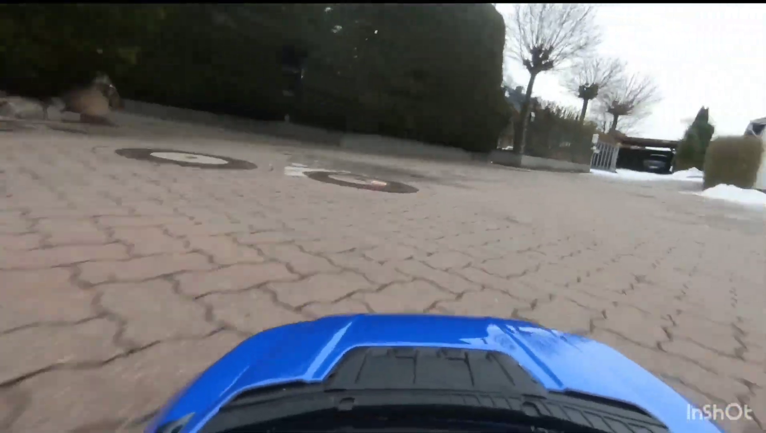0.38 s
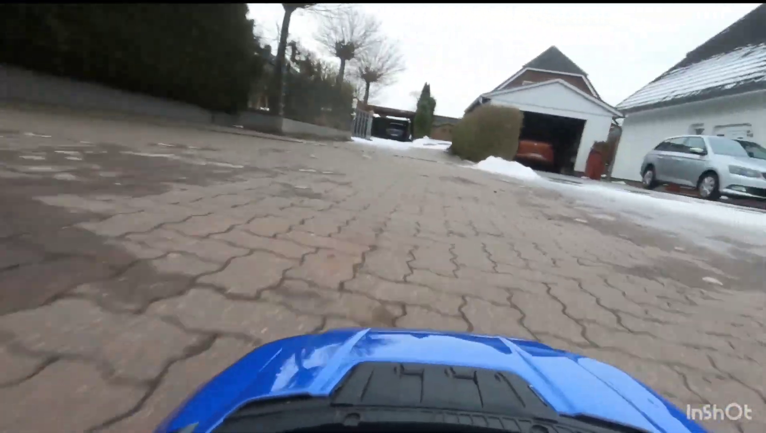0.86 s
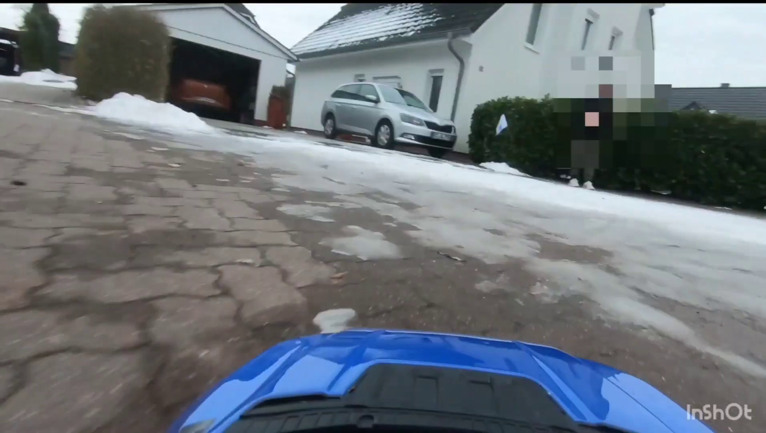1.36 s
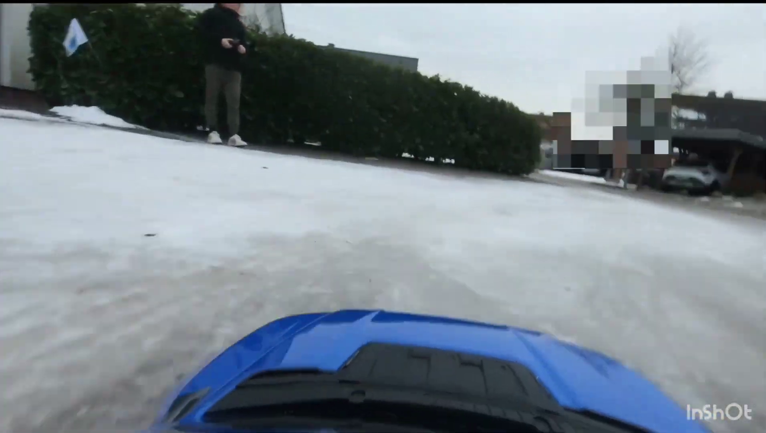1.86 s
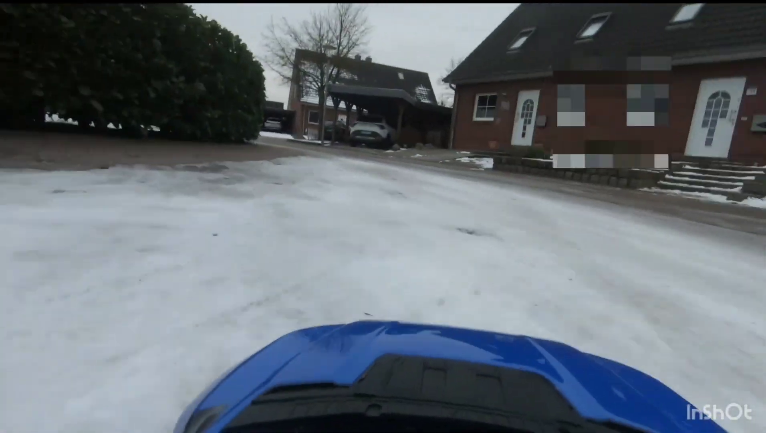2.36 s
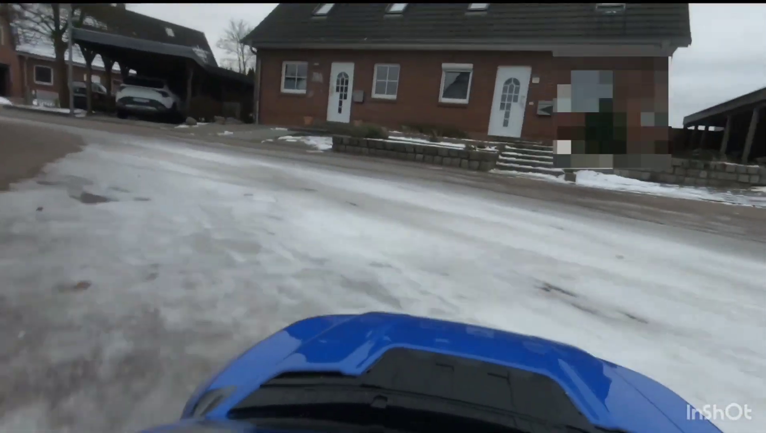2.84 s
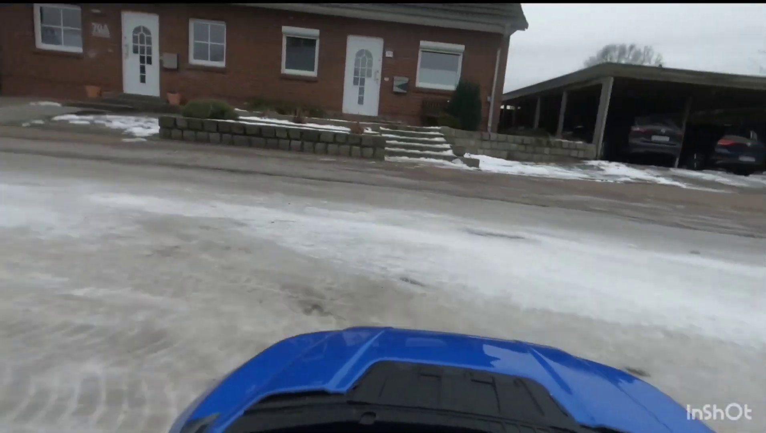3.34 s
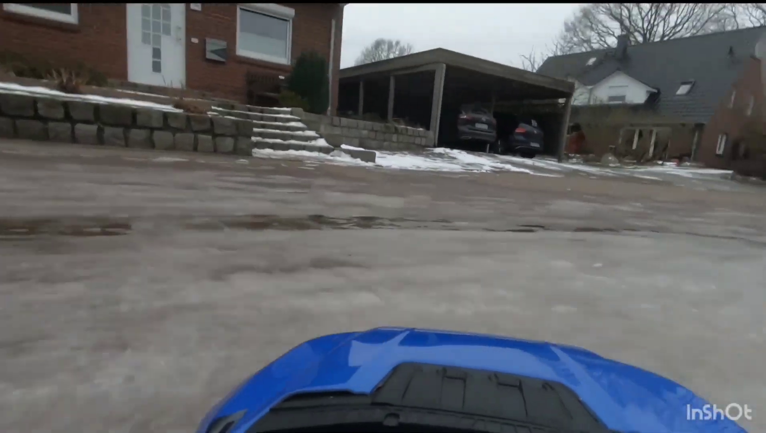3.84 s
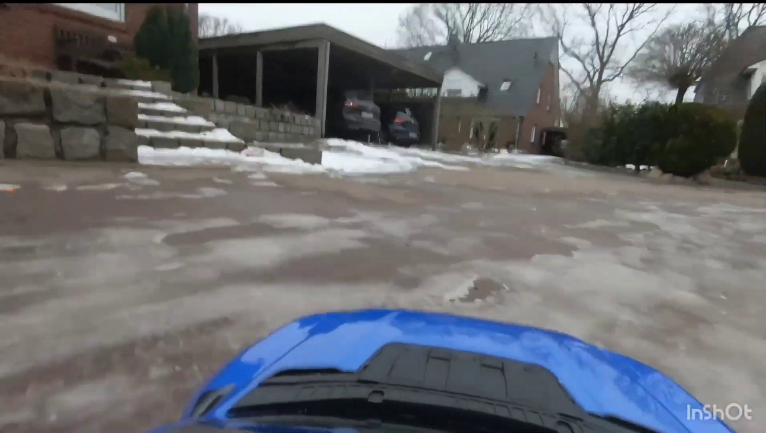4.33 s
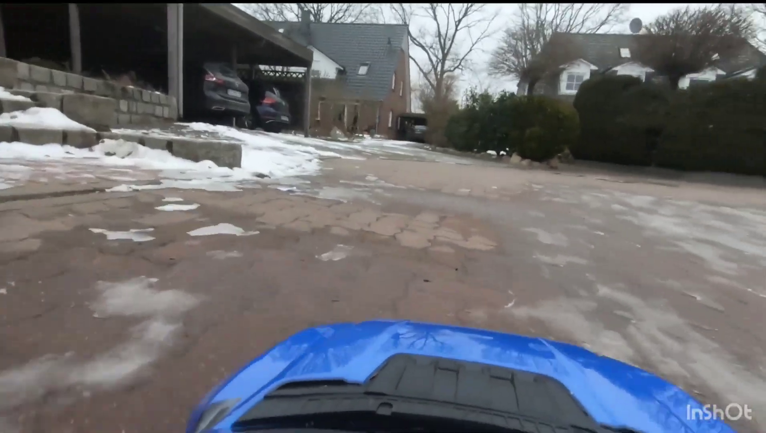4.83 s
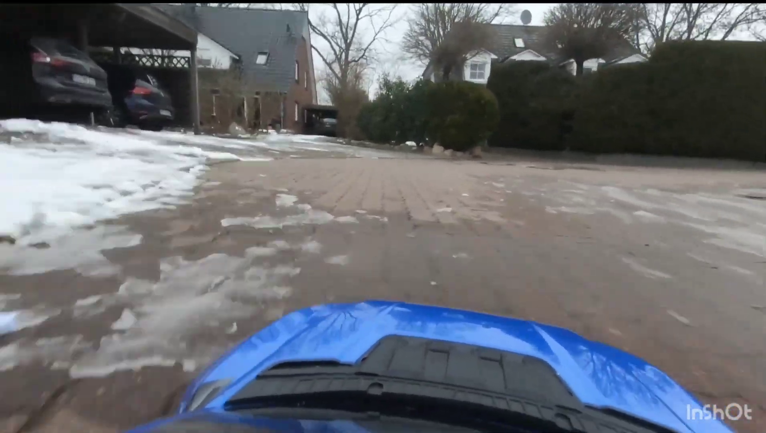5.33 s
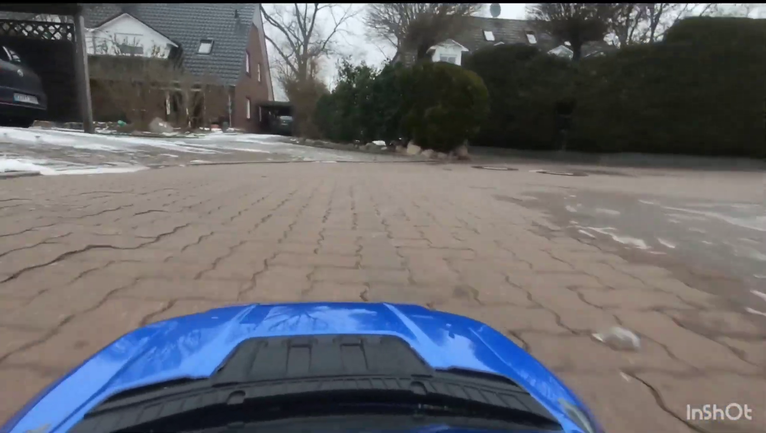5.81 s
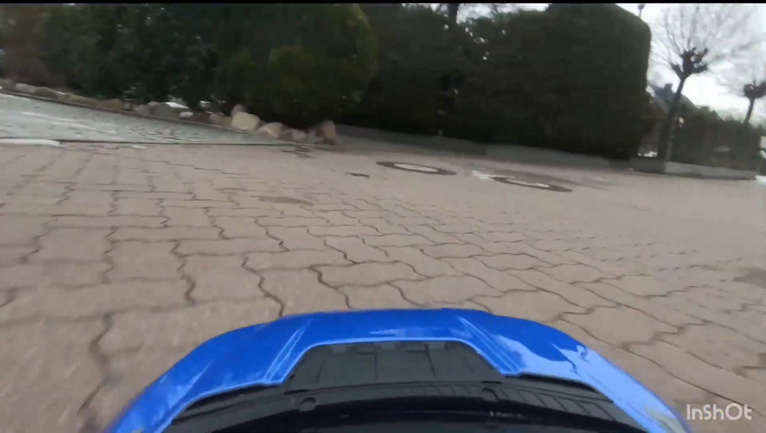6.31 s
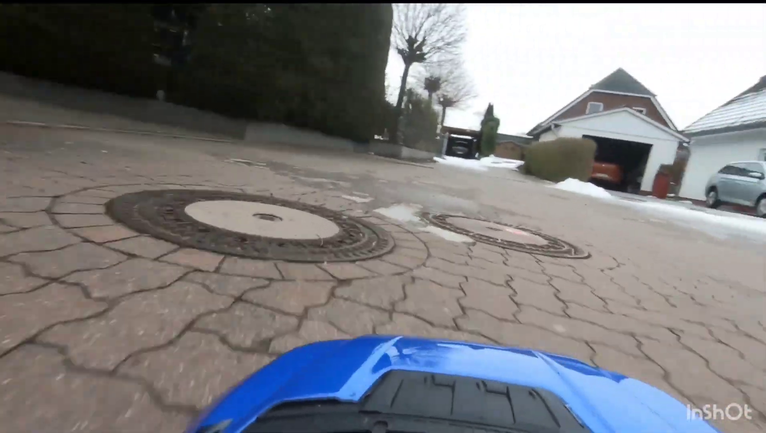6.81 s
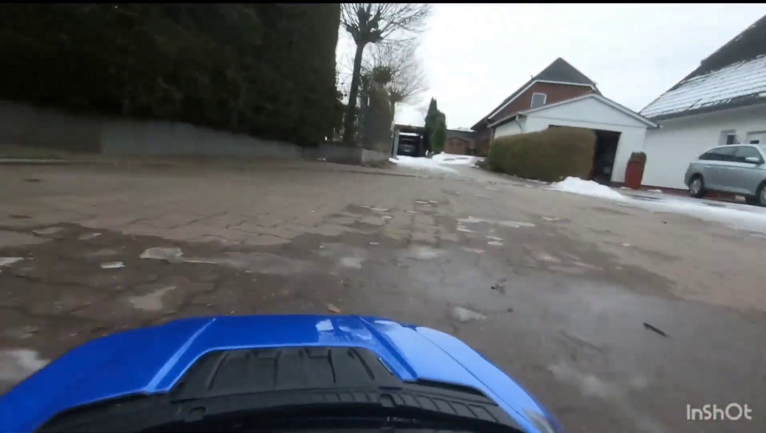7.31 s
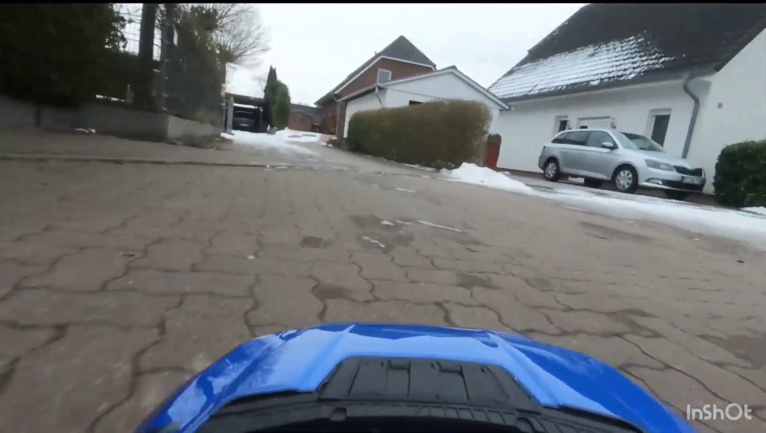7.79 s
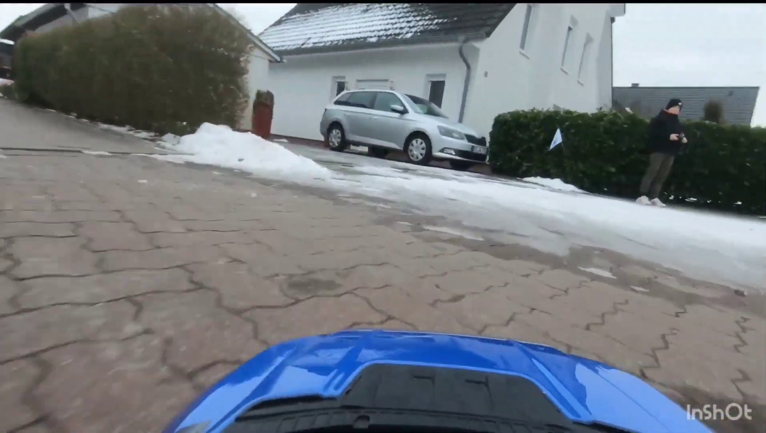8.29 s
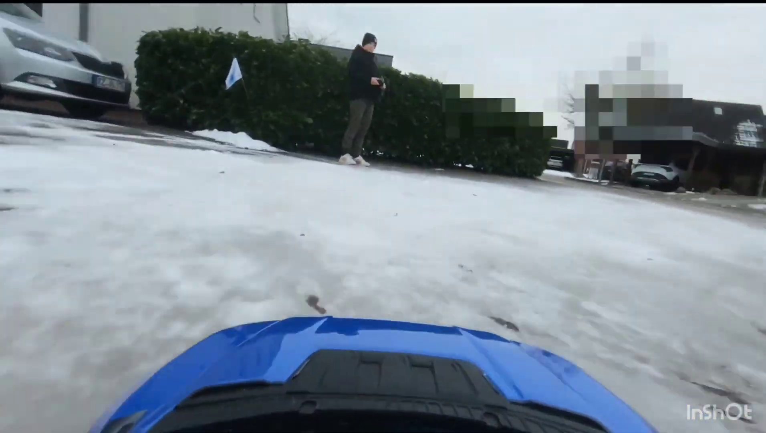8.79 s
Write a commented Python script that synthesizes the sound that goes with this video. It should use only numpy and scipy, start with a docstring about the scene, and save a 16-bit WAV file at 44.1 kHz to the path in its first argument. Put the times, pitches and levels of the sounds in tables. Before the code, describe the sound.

Muffled onboard sound of a small remote-controlled truck: booming bass shake, wobbling gear whine surging on ice, plastic chassis rattle and ice lumps knocking.

```python
"""Paving stones and icy slush under a small electric radio-controlled truck, heard inside a camera case on its roof.
The shaking mount fills the bass as low resonant noise; the tyres and plastic chassis drum, rattle and crunch
as filtered noise; ice lumps strike as scrapes with a brief panel ring. The gear mesh whines as wobbling sines
that follow the motor speed. The muffling case wall filters all but the shake and the panel ring."""
import sys
import numpy as np
from scipy import signal
from scipy.fft import rfft, irfft
from scipy.io import wavfile
from scipy.ndimage import uniform_filter1d

SR = 44100
rng = np.random.default_rng(int(sys.argv[2]) if len(sys.argv) > 2 else 0)


def linear_from_db(decibels):
    """Turn decibels (scalar or array-like) into linear amplitude factors; 0 gives 1."""
    return 10 ** (np.asarray(decibels, float) / 20)


def dump_mix(stems):
    """Bounce the given channels to the path in sys.argv[1] as a 16-bit WAV at rate SR."""
    frames = np.atleast_2d(stems).T  # one column per channel
    limited = np.clip(frames, -1, 1)  # hard clip at full scale
    pcm = np.round(limited * 32767).astype(np.int16)
    wavfile.write(sys.argv[1], SR, pcm)


N = 403956


def curves(table):
    """Linear interpolation: the columns of a time table, one value a sample."""
    s, *columns = np.transpose(table)
    return [np.interp(np.arange(N) / SR, s, column) for column in columns]


def unit(x):
    """Normalisation: scale to rms 1."""
    return x / np.sqrt(np.mean(x ** 2))


def band(x, kind, hz, order=4):
    """Butterworth filtering: a maximally flat pass band."""
    return signal.sosfilt(signal.butter(order, hz, kind, fs=SR, output="sos"), x)


def colour(x, points, modes=(), size=16384):
    """Minimum-phase filtering: a causal response whose gain follows (Hz, dB) points plus bell-shaped lifts."""
    hz = np.maximum(np.arange(size // 2 + 1) * SR / size, 1)
    points_hz, points_db = np.transpose(points)
    db = np.interp(np.log(hz), np.log(points_hz), points_db)
    for centre_hz, width_hz, lift_db in modes:
        db = db + lift_db / (1 + (2 * (hz - centre_hz) / width_hz) ** 2)
    # folding the cepstrum onto positive time makes the response causal
    cepstrum = irfft(np.log(linear_from_db(db)))
    cepstrum[1:size // 2] *= 2
    cepstrum[size // 2 + 1:] = 0
    response = irfft(np.exp(rfft(cepstrum)))
    return signal.fftconvolve(x, response)[:len(x)]


def walk(rate):
    """Low-passed random process: a smooth wander, about rate turns a second, spread 1."""
    k = max(int(SR / rate), 1)
    once = uniform_filter1d(rng.standard_normal(N), k)
    return unit(uniform_filter1d(once, k))


def swells(table):
    """Superposition: Gaussian swells from rows of centre, full width at 1/e, and size."""
    t = np.arange(N) / SR
    return sum(db * np.exp(-(2 * (t - s) / length_s) ** 2) for s, length_s, db in table)


# broad colour of the case wall: frequency_hz, gain_db
CASE_COLOUR = [(100, -9.5), (200, -10), (400, -8.5), (700, -12), (1100, -4.5), (1600, -11.5), (2400, -25),
               (3500, -27), (4500, -34.5), (6000, -39), (7500, -55), (10000, -59.5), (14000, -77.5)]
# resonances and gaps of the case wall: centre_hz, width_hz, lift_db
CASE_RESONANCES = [(141.6, 25, 14.5), (212.6, 76.5, 12), (361, 112, 8), (484.7, 189, -14.5), (620, 74, 5),
                   (850, 88, 4.5), (1163, 112, 5), (1370, 20, 6.5), (1837.5, 98, 10.5), (2270, 390, 10),
                   (2790, 130, -9.5), (2920, 300, 7), (3894, 182, 13.5), (3920, 460, -3.5), (5670, 350, 3),
                   (6180, 160, -5), (6800, 250, 1), (7080, 210, -6), (8000, 670, 6.5), (9300, 310, 0),
                   (9600, 500, -5.5)]


def case_wall(x, size=16384):
    """Transmission loss: the wall muffles the treble, and its resonances lift or notch narrow bands."""
    return colour(x, CASE_COLOUR, CASE_RESONANCES, size)


# excitation of the mount: frequency_hz, relative density_db_per_hz
SHAKE_SPECTRUM = [(4.7, -46.5), (8.0, -5.5), (37, 1), (59, -1), (84, -4), (113, -12.5), (140, -15.5),
                  (180, -44.5), (310, -120)]
# mount resonances: centre_hz, width_hz, lift_db
MOUNT_RESONANCES = [(30.6, 9.9, 4), (61.1, 7, 6.5), (79.5, 7.8, 3.5)]
# strength of the mount shake: time_s, level_db
SHAKE_LEVEL = [(0, -14.5), (.9, -15.5), (1.3, -16), (1.9, -14), (2.1, -17), (2.32, -12.5), (2.5, -15.5),
               (3.25, -16.5), (3.5, -13), (4.7, -15.5), (4.8, -16.5), (6.0, -14), (6.12, -17), (6.55, -15),
               (7.55, -14), (7.72, -16.5), (8.0, -15.5), (9.16, -15)]


def shake():
    """Saturating resonator: the mount swings at low frequencies, and bounded travel flattens big swings."""
    push = unit(colour(rng.standard_normal(N), SHAKE_SPECTRUM, MOUNT_RESONANCES, size=65536))
    swing = np.tanh(0.44 * push)
    return linear_from_db(curves(SHAKE_LEVEL)[0]) * unit(band(swing, "low", 165))


def taps(shared_db, share, spread_db):
    """Random impacts: noise of uneven strength with scattered small ticks, heard through the case wall."""
    # about 60 ticks a second, each fading by 1/e in 3 ms
    ticks = (rng.random(N) < 60 / SR) * linear_from_db(spread_db * rng.random(N) ** 2)
    ticks = signal.lfilter([1], [1, -np.exp(-1 / (.003 * SR))], ticks)
    uneven = linear_from_db(shared_db + 0.63 * walk(120)) * (1 + share * ticks)
    return case_wall(rng.standard_normal(N) * uneven)


BRIGHT_FROM_HZ = 2700  # where dull contact noise gives way to bright

# the ground under the tyres, by roughness and lumpiness: time_s, rattle_db, drumming_db
ROAD_SURFACE = [(0, -39, -26.5), (.44, -35, -29), (.7, -39, -29), (1.15, -38, -28), (1.45, -37.5, -29.5),
                (1.8, -31.5, -27), (2.0, -34.5, -22.5), (2.1, -37.5, -30.5), (2.3, -35, -26),
                (2.55, -38.5, -32.5), (2.9, -37.5, -33.5), (3.45, -34.5, -27), (3.75, -35.5, -26.5),
                (4.11, -40.5, -32), (4.4, -34, -22.5), (4.6, -34.5, -27), (4.77, -38.5, -32),
                (4.87, -37.5, -39.5), (5.0, -35.5, -38.5), (5.3, -35, -34), (5.5, -35.5, -30.5),
                (6.05, -38.5, -30.5), (7.05, -38.5, -28.5), (7.35, -35.5, -24), (7.9, -39, -31.5),
                (8.2, -38.5, -30.5), (8.6, -38, -31), (8.95, -36, -27.5), (9.16, -35.5, -25.5)]
# a wheel rides over a joint or lump: centre_s, length_s, drumming_lift_db
WHEEL_BUMPS = [(1.25, 0.045, 5), (1.84, 0.036, 0.5), (1.98, 0.049, 6.5), (2.32, 0.046, 8), (2.52, 0.083, 6),
               (2.74, 0.16, 11), (3.01, 0.15, 8.5), (3.7, 0.11, 3), (4.35, 0.02, 1), (7.18, 0.037, 6),
               (7.32, 0.051, 2), (8.21, 0.073, 11.5), (8.79, 0.088, 7), (8.95, 0.098, 4.5)]
# the wheels leave the ground for a moment: centre_s, length_s, rattle_dip_db
WHEEL_HOPS = [(2.035, 0.024, 9), (2.62, 0.019, 6), (4.46, 0.061, 8.5), (4.545, 0.016, 5), (4.607, 0.013, 5)]


def chassis():
    """Rolling-contact noise: tyres and loose plastic drum low, rattle in the middle and crunch on top."""
    drum_top_hz, crunch_from_hz = 480, 4300
    rattle_db, drum_db = curves(ROAD_SURFACE)
    bumps_db, hops_db = swells(WHEEL_BUMPS), swells(WHEEL_HOPS)
    rattle_db = rattle_db + 0.44 * bumps_db - hops_db
    drum_db = drum_db + bumps_db - 0.88 * hops_db

    mesh_hz = curves(MESH_DRIVE)[0]
    octaves = np.log2(mesh_hz / 800)
    # below a mesh rate of 420 Hz the rattle's upper part dies away by 24 dB per octave
    crawl_db = -24 * np.maximum(np.log2(420 / mesh_hz), 0)
    bright_db = 0.5 + 3.5 * octaves + 0.3 * crawl_db  # brighter with speed

    shared_db = 0.73 * walk(34) + 2.0 * walk(160)
    body = taps(shared_db, share=0.38, spread_db=7.5)
    grit = taps(shared_db, share=0.13, spread_db=12)

    drum = band(band(body, "high", 110), "low", drum_top_hz)
    scale = np.std(band(body, "band", [1400, 2300]))  # rattle level refers to this band
    dull = band(band(body, "high", drum_top_hz), "low", BRIGHT_FROM_HZ)
    dull = linear_from_db(crawl_db) * dull + (1 - linear_from_db(crawl_db)) * band(dull, "low", 1800)
    bright = band(grit, "high", BRIGHT_FROM_HZ)
    # harder running lifts the crunchy top more than the rest
    crunch = linear_from_db(0.43 * (rattle_db + 26.5) - 9) * band(bright, "high", crunch_from_hz)
    rattle = (dull + linear_from_db(bright_db) * (bright + crunch)) / scale
    return linear_from_db(drum_db) * unit(drum) + linear_from_db(rattle_db) * rattle


# ice lumps and stones on the chassis: time_s, strength_db, relative brightness_db, ring_time_ms
ICE_KNOCKS = [(0.181, -15, -29, 5), (1.838, -6, -29.5, 3), (1.882, -11, -31, 3), (1.9, -4, -26.5, 2.8),
              (1.935, -18, -22, 4), (1.946, -11, -16, 2.5), (1.977, -11.5, -19, 3), (2.01, -5, -21, 2.7),
              (2.121, -12.5, -44, 3.4), (2.179, -14, -28.5, 3.5), (2.205, -13.5, -36, 4),
              (2.308, -8, -24, 3), (2.323, -2.5, -28, 2.7), (2.342, -12.5, -28, 3), (2.381, -7, -26, 3),
              (2.503, -17, -21.5, 3), (2.584, -14, -33, 5), (2.647, -18.5, -19.5, 2.5), (2.712, -9, -25, 8),
              (2.99, -12, -25, 3.7), (3.107, -17, -21, 3), (3.341, -10.5, -42, 3), (3.469, -6, -34, 4),
              (3.841, -11.5, -29, 4.4), (3.911, -10.5, -28, 2.8), (3.926, -12.5, -29, 3.2),
              (3.975, -16.5, -24, 4), (4.162, -14.5, -31, 4.4), (4.225, -25, -15, 3), (4.262, -23, -27, 5),
              (4.282, -11, -16.5, 3.6), (4.335, -19, -26, 6), (4.351, -13.5, -22, 7),
              (4.357, -17, -18.5, 3), (4.374, -22, -19, 4), (4.396, -21, -26, 4.6), (4.41, -15.5, -20, 5),
              (4.42, -2, -26, 2.9), (4.505, -10, -30, 6.5), (4.528, -21, -30, 7), (4.58, -14.5, -36, 3.6),
              (4.669, -24, -26, 4), (4.706, -15, -29, 3), (5.369, -16, -32, 3.7), (5.514, -17, -30, 3),
              (5.852, -16, -34, 2.6), (7.106, -19, -23, 2.5), (7.18, -16.5, -30, 6), (7.5, -10, -28.5, 3.6),
              (7.522, -14.5, -25, 4), (7.559, -14, -31, 4), (7.625, -19.5, -25, 3),
              (8.198, -12.5, -35.5, 3.6), (8.948, -5.5, -19, 2.5), (8.992, -7, -31, 3.5),
              (9.009, -13, -18, 3), (9.035, -8.5, -31, 2.4)]
# modes of the struck panel: frequency_hz, relative level_db
PANEL_MODES = [(990, -6.5), (1140, -0.5), (1310, -8.5)]


def knocks(lead_s=.0045, rise_s=.0018, fall_s=.0028, size=4096):
    """Impact excitation: a lump scrapes ever harder, strikes and rings a panel; the wall filters the scrape."""
    out = np.zeros(N + size)
    t = (np.arange(size) - size // 2) / SR
    scraping = np.where(t < rise_s, np.exp((t - rise_s) / lead_s), np.exp(-(t - rise_s) / fall_s))
    for s, db, bright_db, ring_ms in ICE_KNOCKS:
        scrape = case_wall(rng.standard_normal(size) * scraping, size=4096)
        dull = band(scrape, "low", BRIGHT_FROM_HZ)
        # the hard contact itself is brighter and briefer than the scrape
        contact = (np.gradient(scrape) + 0.27 * scrape) * scraping
        bright = band(contact, "high", BRIGHT_FROM_HZ)

        # a longer, softer contact swells more slowly and rings on
        age = np.maximum(t, 0) * 1000 / ring_ms
        ringing = np.minimum(age / 0.7, 1) * np.exp(-age)
        # each lump lands elsewhere and favours another mode, with a spread of 8 dB
        places_db = 8 * rng.standard_normal(len(PANEL_MODES))
        ring = ringing * sum(linear_from_db(mode_db + place_db) * np.sin(2 * np.pi * hz * t)
                             for (hz, mode_db), place_db in zip(PANEL_MODES, places_db))

        blow = 0.46 * dull / np.abs(dull).max() + 0.64 * ring / ring.max()
        blow += 1.44 * linear_from_db(bright_db) * bright / np.abs(bright).max()
        start = int(s * SR) - size // 2
        out[start:start + size] += linear_from_db(db) * blow * signal.windows.tukey(size)
    return out[:N]


def whine(hz, db, judder, wobble, flutter_db):
    """Frequency and amplitude modulation: worn teeth make a gear line wobble, flutter and come in patches."""
    phase = 2 * np.pi * np.cumsum(hz * (1 + judder * wobble * walk(120))) / SR
    patches_db = 0.84 * judder * walk(16)
    strength = linear_from_db(flutter_db * np.clip(walk(180), -3, 1) + patches_db)
    return linear_from_db(db) * unit(strength * np.sin(phase))


# thin strands of whine that hold their own pitch: start_s, length_s, start_hz, end_hz, level_db
WHINE_STRANDS = [(0.081, .52, 1835, 1854, -39.5), (0.627, 0.64, 1850, 1847, -33),
                 (6.19, .09, 2300, 2190, -25.5), (6.743, 0.13, 2254, 2210, -30)]


def strands(fade_s=0.028):
    """Independent partials: wavering tones, not tied to the mesh rate, fade in and out."""
    t = np.arange(N) / SR
    out = np.zeros(N)
    for s, length_s, from_hz, to_hz, db in WHINE_STRANDS:
        fade = np.clip(np.minimum(t - s, s + length_s - t) / fade_s, 0, 1)
        hz = np.interp(t, [s, s + length_s], [from_hz, to_hz])
        out += fade * whine(hz, db, judder=2.5, wobble=.008, flutter_db=3)
    return out


# gear mesh and the load on its teeth, before the case wall: time_s, mesh_hz, mesh_strength_db
MESH_DRIVE = [(0, 620, -39.5), (.2, 657, -28.5), (.27, 728, -34), (.33, 755, -32), (.47, 753, -32),
              (.53, 725, -33.5), (.64, 628, -34), (.72, 612, -32), (.9, 585, -31.5), (1.0, 545, -34.5),
              (1.12, 502, -42), (1.28, 473, -37), (1.52, 467.4, -31.5), (1.62, 540.7, -28.5),
              (1.8, 850, -29), (1.92, 983, -25.5), (2.08, 1270, -29.5), (2.29, 1280, -24), (2.37, 992, -48),
              (2.5, 431.4, -54), (2.63, 451.2, -44), (2.66, 470, -40), (2.7, 857, -25), (2.73, 1030, -22),
              (2.79, 1190, -27), (2.95, 1287, -25.5), (3.07, 1263, -26), (3.2, 1302, -24.5),
              (3.3, 1240, -24), (3.47, 1252, -25), (3.6, 1276, -22), (3.78, 1268, -25.5), (3.88, 945, -33),
              (4.0, 472.4, -52.5), (4.42, 399, -60), (4.5, 346, -66.5), (4.74, 259.5, -56), (4.8, 334, -47),
              (4.87, 452, -44), (4.94, 510, -42), (5.0, 570, -38), (5.08, 683, -31.5), (5.2, 795, -27),
              (5.33, 932.6, -28), (5.38, 1088, -21), (5.45, 1190, -25), (5.62, 1205, -24),
              (5.85, 1180, -23.5), (6.06, 1125, -23), (6.14, 760, -40.5), (6.34, 687, -34),
              (6.5, 591, -38.5), (6.73, 538.5, -37.5), (7.1, 512.6, -35), (7.33, 560.3, -38),
              (7.62, 529, -37), (7.9, 580.4, -40.5), (7.99, 640, -31), (8.15, 650, -35), (8.25, 592, -40),
              (8.45, 547.3, -40), (8.7, 539.5, -36.5), (8.81, 700, -36.5), (8.95, 946, -31.5),
              (9.16, 959, -29)]
# how hard the motor pulls sets its overtones: time_s, motor_fourth_multiple_db, mesh_second_multiple_db
MOTOR_PULL = [(0, -30.5, -45), (.2, -28, -28), (.28, -24, -28), (.48, -19.5, -34), (.54, -31, -39),
              (.62, -41, -37), (.95, -47, -49), (1.2, -37, -49), (1.3, -26.5, -45), (1.55, -24, -45),
              (1.65, -18.5, -30), (1.8, -23, -24), (1.95, -29, -43), (2.06, -26, -24), (2.29, -34, -24),
              (2.37, -62, -56), (2.625, -42, -50), (2.648, -18, -51), (2.67, -30, -40), (2.71, -28, -34),
              (2.76, -38, -36), (2.85, -36, -20.5), (2.95, -26, -32), (3.2, -25, -21.5), (3.3, -27, -18),
              (3.45, -32, -20), (3.52, -29, -22), (3.78, -34, -26.5), (3.9, -42, -48), (4.0, -44, -55),
              (4.74, -47, -61), (4.8, -29.5, -50), (4.86, -28, -34), (4.93, -32, -21.5), (5.0, -24, -34.5),
              (5.04, -31, -26), (5.08, -17, -20), (5.12, -19.5, -41), (5.25, -25, -39), (5.34, -21, -35),
              (5.37, -29, -30.5), (5.45, -37, -20), (5.85, -34, -24), (6.06, -34, -28.5), (6.14, -37, -31),
              (6.28, -29, -33), (6.35, -31, -24), (6.55, -32, -41), (6.8, -33, -41), (7.2, -27.5, -31),
              (7.4, -39, -35.5), (7.9, -33, -46), (7.99, -30, -25.5), (8.15, -29, -30.5), (8.25, -42, -43),
              (8.45, -38, -48), (8.72, -33, -41), (8.82, -29, -32), (8.95, -29, -38), (9.16, -24, -41)]
# tyres slipping and biting on ice make the load surge: time_s, surge_depth_db
TYRE_SLIP = [(0, 1), (1.5, 1), (1.9, 2.5), (2.8, 2), (3.0, 3), (3.8, 3), (4.7, 1), (5.3, 0.67), (6.1, 0.4),
             (6.3, 1), (8.6, 1), (9.16, 2.5)]
# gear lines: multiple of the mesh rate, level_db against the mesh strength,
# slope_db_per_octave of speed, pitch wobble share before judder
GEAR_LINES = [(.31, -8, -0.5, .012), (.78, -11, 4, .05), (.92, -3.5, -2, .032), (1.0, 2.5, -2.5, .016),
              (1.13, -0.5, -3, .026), (1.31, -13.5, 5, .015), (2.85, -4, -0.5, .03)]


def gears():
    """Gear-mesh harmonics: mesh lines and motor overtones follow the speed, heard through the case wall."""
    hz, mesh_db = curves(MESH_DRIVE)
    fourth_db, second_db = curves(MOTOR_PULL)
    drum_db = curves(ROAD_SURFACE)[1]

    # a motor gaining 1.5 octaves per second pulls fully
    gaining = uniform_filter1d(np.gradient(np.log2(hz)) * SR, size=2000) / 1.5
    # slack gears are jerked about by the wheels, loaded ones run steadier
    judder = np.interp(mesh_db, [-37, -27], [2.6, 1.4])
    judder = judder * (1 - 0.1 * np.clip(gaining, 0, 1))  # pulling irons out some wobble
    judder = judder * linear_from_db(0.4 * (drum_db + 29))  # lumpy ground adds to it
    # bumps under the wheels jerk the speed of the whole drivetrain
    hz = hz * (1 + .0025 * judder * walk(25))
    octaves = np.log2(hz / 800)

    # the speed flares by a share of .002 with each dB of surge
    surge_db = curves(TYRE_SLIP)[0] * walk(21.98)
    hz = hz * (1 + .002 * surge_db)
    mesh_db = mesh_db + surge_db

    out = strands()
    for k, db, slope_db, wobble in GEAR_LINES:
        out += whine(k * hz, mesh_db + db + slope_db * octaves, judder, wobble, flutter_db=4.5)
    out += whine(2 * hz, second_db, judder, wobble=0.00702, flutter_db=5.0)
    # the brushes bounce, so the motor's fourth multiple keeps dropping out
    fourth_db = fourth_db + 4.5 * np.clip(walk(24), -3, .8)
    out += whine(4 * hz, fourth_db, np.sqrt(judder), wobble=.018, flutter_db=4.5)
    # a line just above smears it upward
    out += whine(4.16 * hz, fourth_db - 0.5, np.sqrt(judder), wobble=.022, flutter_db=4.5)
    return case_wall(out)


def scene():
    """Superposition: mount, chassis, knocks and gears add on one channel."""
    return (shake() + chassis() + knocks() + gears())[None]


def low_pass(x):
    """Removes everything above the highest recorded frequency."""
    return signal.sosfilt(signal.butter(12, 13600, fs=SR, output="sos"), x)


def record(dry):
    """Soft saturation: the camera rounds the loudest peaks."""
    rounded = np.tanh(1.125 * dry) / 1.046
    return low_pass(rounded)


dry = scene()
out = record(dry)
dump_mix(out)
```